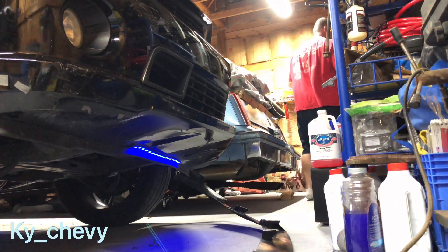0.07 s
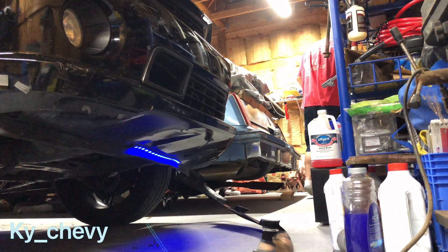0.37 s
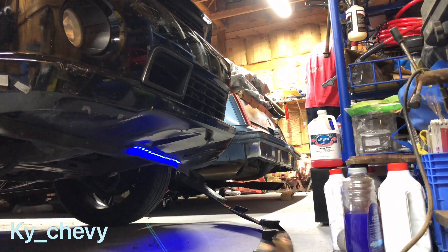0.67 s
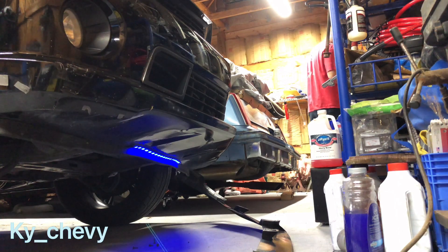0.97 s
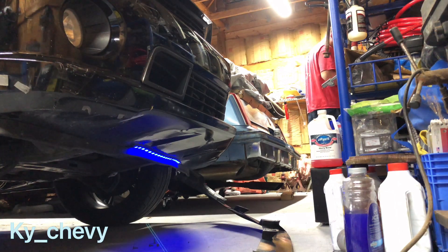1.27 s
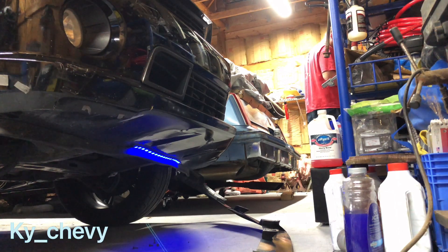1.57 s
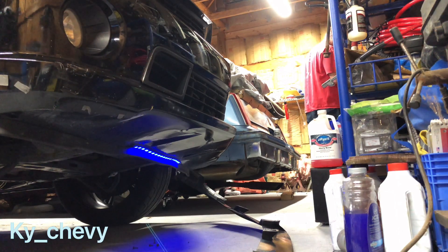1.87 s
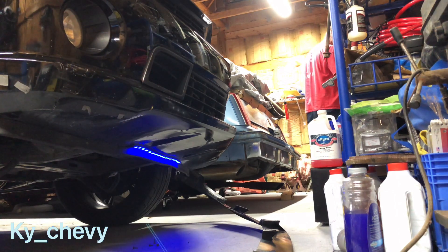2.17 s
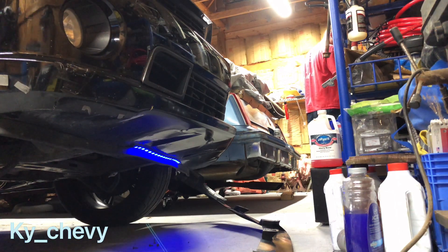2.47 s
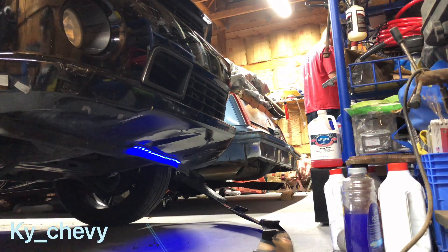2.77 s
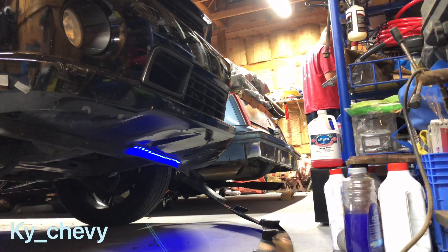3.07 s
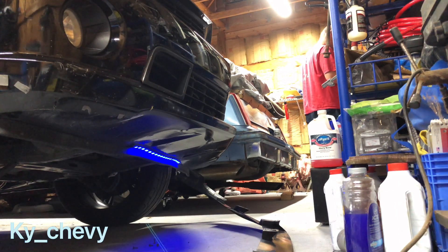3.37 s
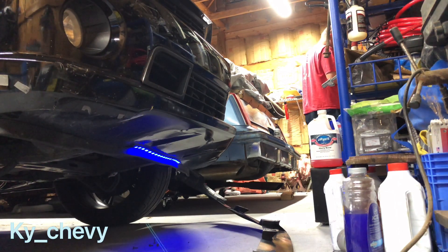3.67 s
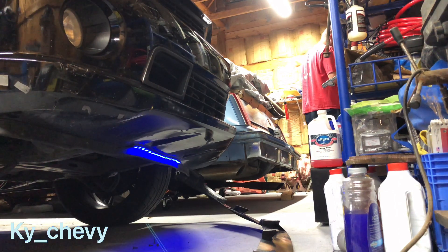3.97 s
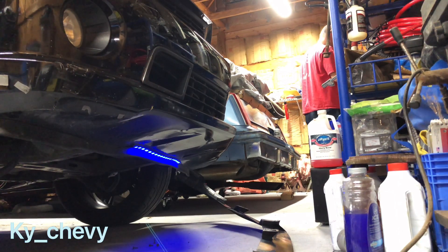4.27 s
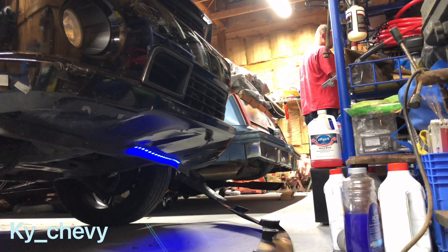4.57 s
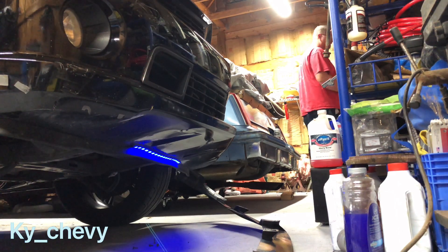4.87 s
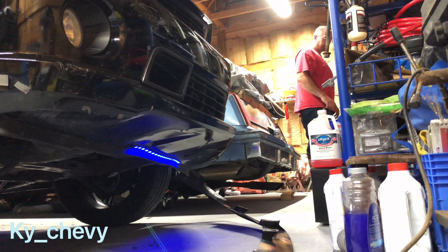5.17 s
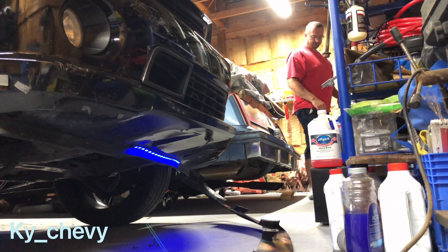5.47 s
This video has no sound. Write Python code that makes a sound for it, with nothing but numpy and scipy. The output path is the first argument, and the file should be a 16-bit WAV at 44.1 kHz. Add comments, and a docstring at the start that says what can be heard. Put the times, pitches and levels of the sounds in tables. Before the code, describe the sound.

Someone rummages through hard tools on a shelf, heard from across a garage, so everything carries short room reflections over a quiet, steady rumble and hiss. Soft steps pad on concrete from about 0.5 to 1.3 seconds. A box slides briefly and lands with a sharp knock at 0.9 seconds. From 1.5 seconds a can bumps and scrapes and a hand tool clacks, leading to the two loudest clunks at about 1.9 and 2 seconds, which boom in the shelf board. At 2.4 seconds a light bump starts a metal tool dragging, ending in a ringing clank at 2.8 seconds. Only the room noise remains until 4.1 seconds, when light knocks and scrapes resume, finishing with metallic clinks and a hollow thud around 4.5 seconds. Three very faint ticks follow between 5 and 5.7 seconds.

```python
"""Hard tools knock and slide on a shelf as someone rummages at the far side of a garage.
Each knock is a short clatter that booms in the shelf board and rings in the object; broad things
land twice. Dragged objects catch and slip, rasping and ringing, and soft steps pad in between.
It arrives mostly as reflections from walls and clutter, over a quiet bed of rumble and hiss."""
import sys
import numpy as np
from scipy import signal
from scipy.fft import rfft, irfft
from scipy.io import wavfile

SR = 44100
rng = np.random.default_rng(int(sys.argv[2]) if len(sys.argv) > 2 else 0)


def generate_wav(sig):
    """Save sig (samples, or channels by samples) to the path in sys.argv[1] as 16-bit PCM at SR."""
    pcm = np.round(np.clip(np.atleast_2d(sig).T, -1, 1) * 32767).astype(np.int16)
    wavfile.write(sys.argv[1], SR, pcm)


N = 252252

# room tone shape: (frequency [Hz], relative density [dB])
ROOM_TONE = [(15, -55), (25, -25), (49, -2), (91, -1.5), (113, -5), (144, -1), (169, -10), (193, -6.5),
             (389, -14.5), (703, -20), (804, -19), (1850, -27.5), (5580, -32), (9810, -35.5),
             (15500, -37.5)]
# garage reverb: (frequency [Hz], t60 [s])
GARAGE_DECAY = [(80, 0.8), (250, 0.43), (700, 0.45), (2000, 0.53), (4500, 0.48), (8000, 0.42),
                (14000, 0.31)]
# soft steps on concrete: (time [s], level [dB])
FOOTSTEPS = [(0.134, -68), (0.505, -51), (0.69, -47.5), (0.791, -52), (1.249, -52.5), (2.298, -60)]
# each object's ring, a row per mode: (frequency [Hz], level [dB], t60 [s])
OBJECT_MODES = { "bit": [(2677, -5, .11), (4307, 0, .12), (6087, -3, .11), (8764, -4, .09)],
                "box": [(372, -3.5, 0.45), (572, -3.5, 0.17), (785, -7, 0.23), (2742, 7.5, 0.062),
                (3770, 10.5, 0.039), (7240, -15, 0.092)], "can": [(416, -3, 0.12), (593, -10, 0.1),
                (1035, -5.5, 0.12), (2685, -0.5, 0.039), (2930, -4, 0.041)], "pliers": [(546, 6, 0.082),
                (866, -13, .14), (1530, -20, 0.095), (2010, -2, 0.058), (3090, 3, 0.054)],
                "case": [(191.7, -1.5, 0.2), (294.4, -16, 0.4), (513.6, -2, 0.085), (517, -6, 0.14),
                (972, -14, 0.092)], "wrench": [(331.6, -11, 0.51), (377, -10, 0.22), (586, -3.5, 0.082),
                (1136, -0.5, 0.14), (1340, -6, 0.15), (2078, -5, 0.24), (2560, -7.5, 0.24),
                (2980, 1.5, 0.13), (3380, -8, 0.12), (3750, -6, 0.08), (12000, -7, 0.079)],
                "rod": [(808, -21, 0.22), (1993, -14, 0.14), (2100, -13, 0.12), (2936, -5, 0.092),
                (3240, -6.5, 0.12), (4980, -9.5, 0.11), (9600, -22, 0.081)], "tray": [(66.4, -11, 0.34),
                (103, 12, 0.063), (283.3, -3.5, 0.16), (312.3, -7, 0.5), (413, -19, 0.32),
                (520, 1.5, 0.081), (640, -19, 0.46), (1156, -9, 0.35)]}
# the shelf board's boom: (frequency [Hz], level [dB], t60 [s])
SHELF_MODES = [(93.5, -6, 0.59), (127.8, 4, 0.33), (186.5, -9.5, 0.37), (290, -13, 0.4), (352, -28, 1),
               (365.3, -22, 0.45), (454, -15, 0.27), (573, -5, 0.21), (621, -23, 0.46), (770, -30, 0.44)]
# drags: (start [s], end [s], object, ring before swell [dB], rasp before swell [dB], push cutoff [Hz])
DRAG_CUES = [ (0.639, 0.924, "box", -73, -67.5, 1200), (1.59, 1.88, "can", -60, -57, 1200),
             (1.948, 2.01, "case", -45, -49, 1200), (2.436, 2.814, "wrench", -94, -64, 1200),
             (4.127, 4.309, "rod", -87, -62.5, 1220), (4.278, 4.449, "tray", -57, -63, 350),
             (4.479, 4.54, "rod", -52, -49.5, 1800)]
# tone of the rasp: (frequency [Hz], half-octave band gain [dB])
RASP_EQ = [(50, -17), (130, 7.5), (250, 5.5), (500, 6.5), (900, 5), (2500, 5), (4500, 3), (8000, -2.5),
           (15000, -6)]
# tone shared by all clatter: (frequency [Hz], half-octave band gain [dB])
CLATTER_EQ = [(45, -53), (80, -10.5), (150, -6.5), (260, -12.5), (500, -10), (800, -12.5), (1500, -8.5),
              (3000, -6), (5000, -2.5), (8000, -3), (11000, -6.5), (15000, -2.5)]
# where thud, clack, edge, tick and fizz sit: (frequency [Hz])
KNOCK_REGISTERS = [150, 650, 3000, 8500, 14000]
# how each object meets the board: (ring gain [dB], thud gain [dB], edge gain [dB], low cut [Hz])
OBJECT_VOICING = { "bit": (13, 0, -1, 107), "box": (4.5, -2, -1, 137), "can": (24, -12, 1.5, 126),
                  "pliers": (11.5, -3, 1.5, 112), "case": (22, -7, -2.5, 62),
                  "wrench": (12.5, -11.5, 7.5, 86), "rod": (20.5, -54, 2, 120),
                  "tray": (23, -7.5, -2.5, 45)}
# second touch of each broad object: (level relative to the first [dB])
SETTLE_LEVELS = {"can": -6, "case": -7, "tray": -10}
# pick-ups, bumps and put-downs: (time [s], object, level [dB], treble loss [dB/octave], contact [s])
KNOCK_CUES = [ (0.185, "bit", -58.5, 2, 0.02), (0.689, "bit", -58, 2.5, 0.0071),
              (0.903, "box", -29, 2.5, 0.008), (1.426, "bit", -65.5, 2.5, 0.012),
              (1.513, "rod", -63.5, 5, .005), (1.581, "bit", -55, 6, 0.0033),
              (1.632, "can", -41.5, 25, 0.005), (1.692, "can", -37.5, 6, 0.0027),
              (1.817, "pliers", -37, 3, .004), (1.916, "case", -26.5, 5, 0.0076),
              (2.033, "case", -23.5, 7, 0.0025), (2.405, "can", -46, 7, 0.022),
              (2.648, "wrench", -47.5, 5, 0.0066), (2.793, "wrench", -33.5, 3, 0.007),
              (4.106, "can", -45.5, 7.5, 0.0036), (4.2, "rod", -50.5, 4.5, 0.0045),
              (4.467, "rod", -45, 1.96, 0.0075), (4.525, "rod", -41, 3, 0.016),
              (4.544, "tray", -34.5, 6, 0.0075), (5.036, "bit", -69.5, -1.1, 0.027),
              (5.422, "bit", -75.5, -0.8, 0.013), (5.653, "bit", -70.5, -1.2, 0.027)]

EDGES_HZ = np.geomspace(31, 16000, 19)   # half-octave bands
CENTRES_HZ = np.sqrt(EDGES_HZ[1:] * EDGES_HZ[:-1])
AGE = np.arange(SR) / SR   # seconds since a sound's onset


def from_db(db):
    """Decibels to gain."""
    return 10 ** (np.asarray(db) / 20)


def rms_one(x):
    """Scale to unit power."""
    return x / np.sqrt(np.mean(x ** 2, axis=-1, keepdims=True) + 1e-20)


def at_hz(points, hz):
    """Read a curve on a log-frequency axis."""
    known_hz, values = np.transpose(points)
    return np.interp(np.log(hz), np.log(known_hz), values)


def add(track, s, sound):
    """Mix a sound into the track at s seconds."""
    start = max(round(s * SR), 0)
    track[start:start + len(sound)] += sound[:N - start]


def bandpass(x, edges_hz):
    """Keep the band between two edges."""
    return signal.sosfilt(signal.butter(2, edges_hz, "band", fs=SR, output="sos"), x)


def in_bands(pair):
    """Half-octave bands of unit power, cut in turn from two unrelated signals."""
    bands = zip(EDGES_HZ, EDGES_HZ[1:])
    return np.array([rms_one(bandpass(pair[k % 2], edges)) for k, edges in enumerate(bands)])


def decays(t60):
    """Envelopes that fall 60 dB in the given times."""
    return from_db(-60 * AGE / np.maximum(t60, .01)[:, None])


def attack(rise_s):
    """A fade-in that eases up to full level."""
    return 1 - np.exp(-AGE / rise_s)


def room_tone(air_db=-65, hiss_db=-86, hiss_hz=10000, hiss_q=12.0):
    """The bed: steady rumble and hiss, with a narrow band standing out in the treble."""
    hz = np.linspace(1, SR / 2, N // 2 + 1)
    air = irfft(rfft(rng.standard_normal(N)) * from_db(at_hz(ROOM_TONE, hz)), N)
    hiss = signal.lfilter(*signal.iirpeak(hiss_hz, hiss_q, fs=SR), rng.standard_normal(N))
    return from_db(air_db) * rms_one(air) + from_db(hiss_db) * rms_one(hiss)


def reflections(lumpy_db=3.0, merge_s=0.023):
    """Echoes by band: the first are uneven in strength, later ones merge into a smooth wash."""
    sizes = from_db(lumpy_db * np.exp(-AGE / merge_s) * rng.standard_normal((2, SR)))
    return in_bands(sizes * rng.standard_normal((2, SR)))


def garage(x):
    """Diffuse reverb at unit gain; the top dies first."""
    echoes = np.sqrt(CENTRES_HZ) @ (reflections() * decays(at_hz(GARAGE_DECAY, CENTRES_HZ)))
    return signal.fftconvolve(x, echoes / np.linalg.norm(echoes))[:N]


def steps(pad_hz=150, pad_q=2.7, rise_s=0.02, t60=0.31):
    """A soft sole gives only a dull pad that the room draws out."""
    out = np.zeros(N)
    edges_hz = pad_hz * 2 ** (np.array([-1, 1]) / pad_q)
    for s, level_db in FOOTSTEPS:
        pad = rms_one(bandpass(rng.standard_normal(SR), edges_hz))
        add(out, s, from_db(level_db) * pad * attack(rise_s) * decays([t60])[0])
    return out


def low_cut(hz, lowest_hz):
    """Bass roll-off: a light object cannot drive the slowest vibrations."""
    return 1 / np.sqrt(1 + (lowest_hz / hz) ** 8)


def struck(modes, lowest_hz, detune=0.0, partials=1):
    """A struck body rings in decaying modes; in a loose object each splits into close partials."""
    hz, level_db, t60 = np.repeat(modes, partials, axis=0).T
    hz = hz * (1 + detune * rng.standard_normal(len(hz)))
    gains = from_db(level_db) * low_cut(hz, lowest_hz) / np.sqrt(partials)
    signs = (-1) ** (np.arange(len(hz)) // partials)   # neighbouring modes start in opposite directions
    phases = np.tile(np.pi * np.arange(partials) ** 2 / partials, len(modes))   # partials out of step
    tones = np.sin(2 * np.pi * hz[:, None] * AGE + phases[:, None])
    return (gains * signs) @ (tones * decays(t60))


def drags(slips_per_s=420, uneven_db=5.5, rise_s=0.033, swell_db_per_s=13.5, lowest_hz=220):
    """A dragged object catches and slips at random, rasping and ringing louder as it gathers speed."""
    out = np.zeros(N)
    colour = from_db(at_hz(RASP_EQ, CENTRES_HZ))
    for start, end, thing, ring_db, rasp_db, push_hz in DRAG_CUES:
        sizes = rng.choice([-1, 1], (2, SR)) * from_db(uneven_db * rng.standard_normal((2, SR)))
        slips = sizes * (rng.random((2, SR)) < slips_per_s / SR)
        rasp = from_db(rasp_db) * rms_one(colour @ in_bands(slips))
        pushes = signal.lfilter(*signal.butter(2, push_hz, fs=SR), slips[0])   # soft on the high modes
        body = struck(OBJECT_MODES[thing], lowest_hz, detune=0.019, partials=4)
        ring = from_db(ring_db) * rms_one(signal.fftconvolve(pushes, body)[:SR])
        speed = attack(rise_s) * from_db(swell_db_per_s * AGE) * (AGE < end - start)
        add(out, start, (rasp + ring) * speed)
    return garage(out)


def clatter(register_db, lowest_hz, contact_s, tail_db=-2.5, early_s=0.026, early_hz=2500,
            bass_lag_s=0.019, bass_hz=300):
    """One hard contact from across the room: a bright cluster of early echoes, then the tail."""
    hz = CENTRES_HZ[:, None]
    blow_db = np.interp(np.log(CENTRES_HZ), np.log(KNOCK_REGISTERS), register_db)
    gains = from_db(blow_db + at_hz(CLATTER_EQ, CENTRES_HZ)) * low_cut(CENTRES_HZ, lowest_hz)
    rise_s = contact_s / 2 + bass_lag_s / (1 + hz / bass_hz)   # the lows bloom later
    swell = 1 - np.exp(-(AGE / rise_s) ** 2)
    early = hz / (hz + early_hz) * np.exp(-(AGE / early_s) ** 2)
    tail = from_db(tail_db) * decays(at_hz(GARAGE_DECAY, CENTRES_HZ))
    return gains @ (reflections() * swell * np.hypot(early, tail))


def chatter(sound, rebound=0.16, within_s=.007, count=6):
    """A hard thing rebounds within milliseconds, giving each blow its own ragged colour."""
    taps = np.zeros(round(within_s * SR) + 2)
    taps[rng.integers(1, len(taps), count)] = rebound * rng.choice([-1, 1], count)
    taps[0] = 1
    return signal.fftconvolve(sound, taps / np.linalg.norm(taps))


def touches(settle_s=0.033, settle_contact_s=0.015, brighten_db_per_octave=0.3, flat_thud_db=3.5):
    """Every contact: broad things land on one edge, then drop flat, quieter but weighted to the thud."""
    for s, thing, level_db, loss_db, contact_s in KNOCK_CUES:
        yield s, thing, level_db, loss_db, contact_s, 0
        if thing in SETTLE_LEVELS:
            yield (s + settle_s, thing, level_db + SETTLE_LEVELS[thing],
                   loss_db - brighten_db_per_octave, settle_contact_s, flat_thud_db)


def knocks(boom_db=0.5, boom_rise_s=0.018, ring_rise_s=0.0034, muffle_db_per_s=906, send_db=-5.0):
    """Each knock clatters, booms the board by its weight and rings the object by its sharpness."""
    out, rings = np.zeros(N), np.zeros(N)
    octaves_above_clack = np.log2(np.array(KNOCK_REGISTERS[1:]) / KNOCK_REGISTERS[1])
    for s, thing, level_db, loss_db, contact_s, flat_db in touches():
        ring_db, weight_db, hard_db, lowest_hz = OBJECT_VOICING[thing]
        thud_db = level_db + weight_db + flat_db
        clack_db, edge_db, tick_db, fizz_db = level_db - loss_db * octaves_above_clack
        register_db = [thud_db, clack_db, edge_db + hard_db, tick_db, fizz_db]
        add(out, s, chatter(clatter(register_db, lowest_hz, contact_s)))
        boom = struck(SHELF_MODES, lowest_hz) * attack(boom_rise_s)
        add(out, s, from_db(thud_db + boom_db) * boom)
        ring = struck(OBJECT_MODES[thing], lowest_hz, detune=0.012, partials=6) * attack(ring_rise_s)
        muffle_db = muffle_db_per_s * contact_s   # a lingering contact chokes the ring
        add(rings, s, from_db(tick_db + ring_db - muffle_db) * ring)
    return out + rings + from_db(send_db) * garage(rings)


def scene():
    """The mono mix: knocks, drags and steps over the room tone."""
    return (knocks() + drags() + steps() + room_tone())[None]


def record(dry):
    """A steep high cut at 15.9 kHz."""
    return signal.sosfilt(signal.ellip(10, .2, 70, 15900, fs=SR, output="sos"), dry)


dry = scene()
out = record(dry)
generate_wav(out)
```